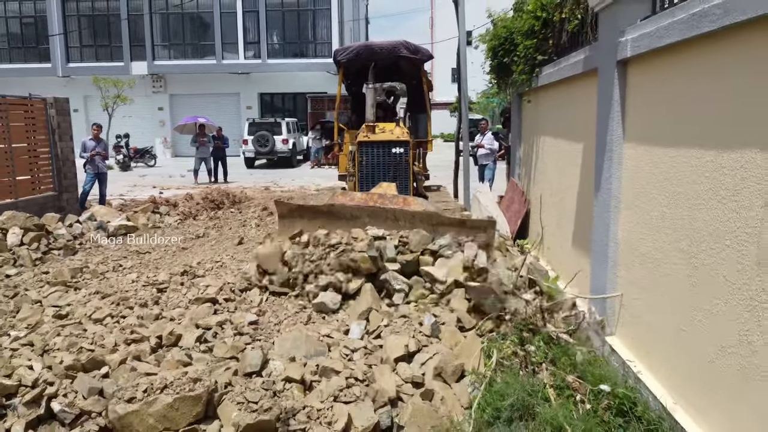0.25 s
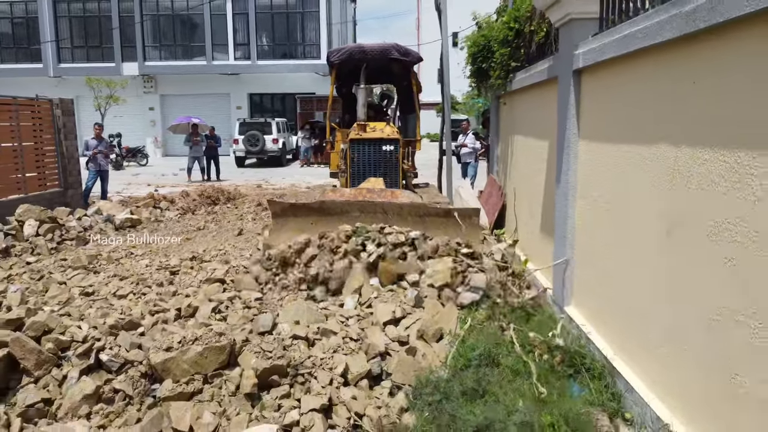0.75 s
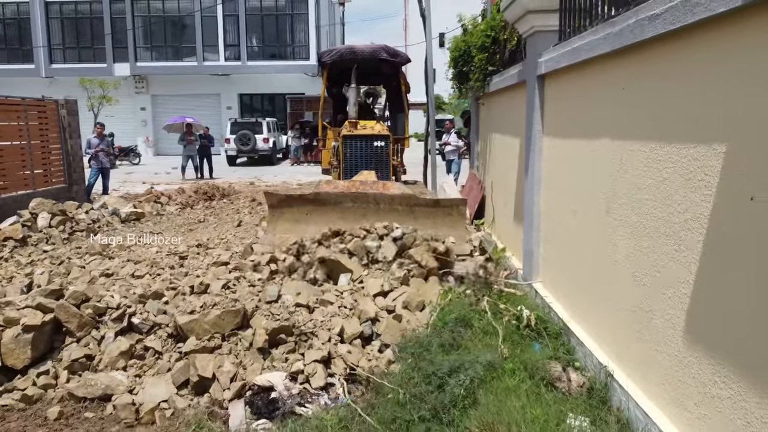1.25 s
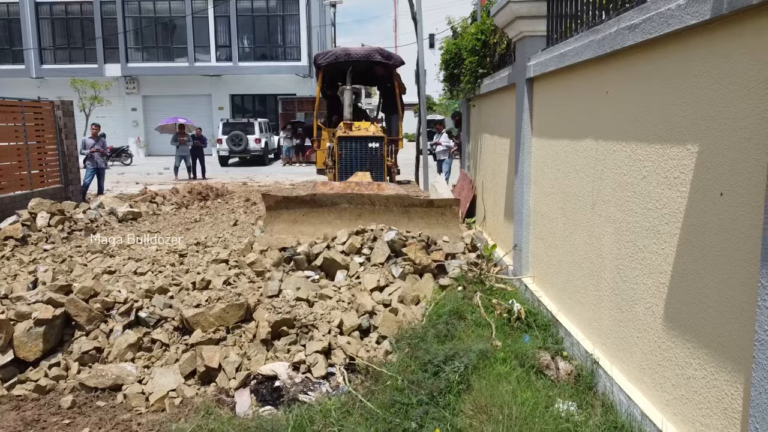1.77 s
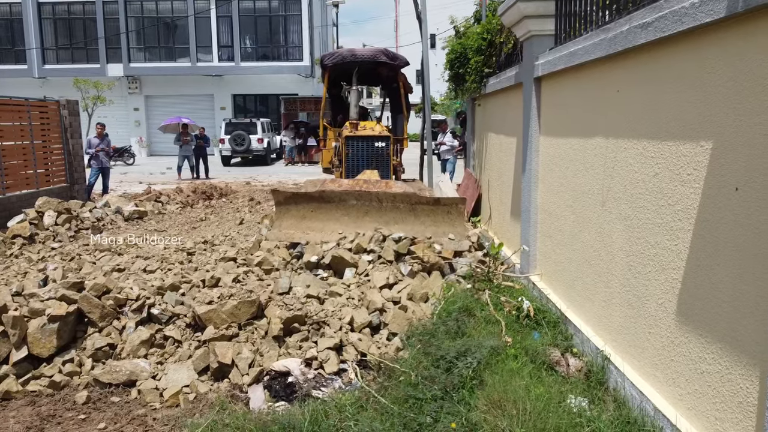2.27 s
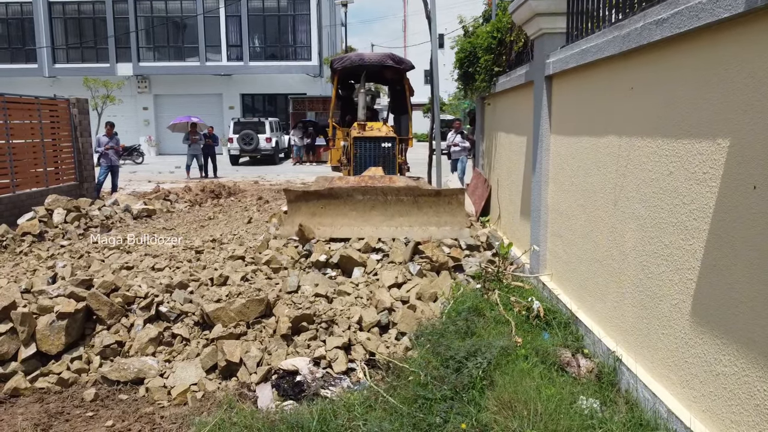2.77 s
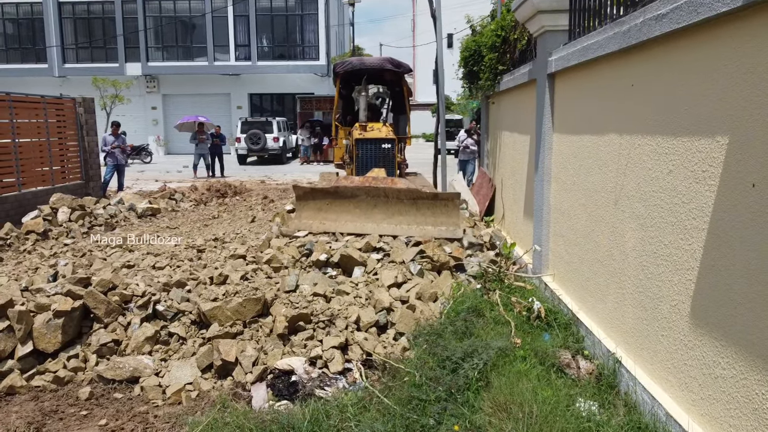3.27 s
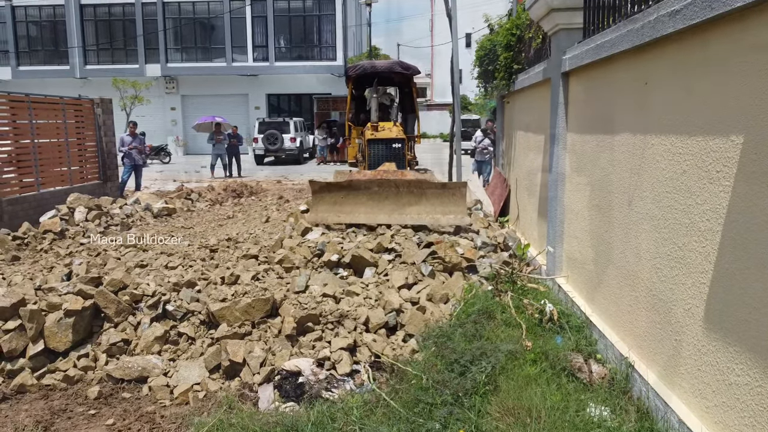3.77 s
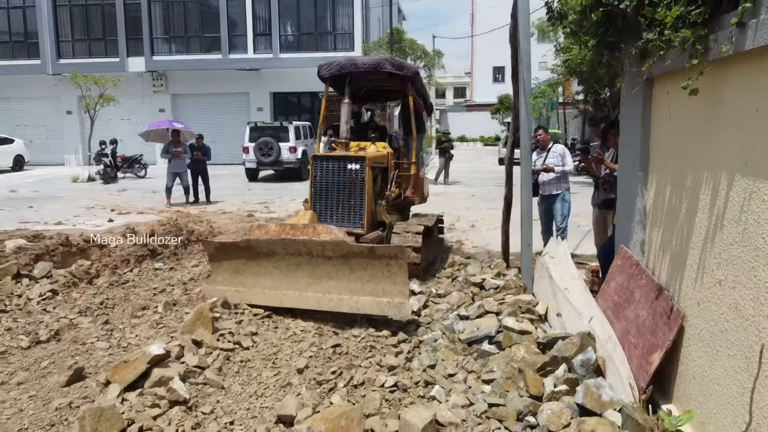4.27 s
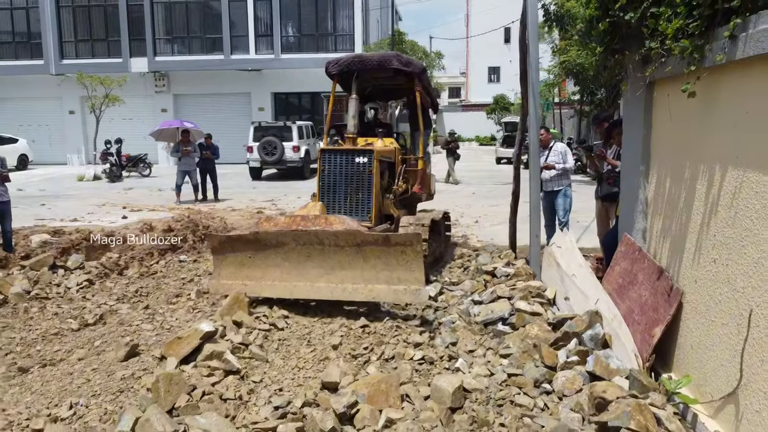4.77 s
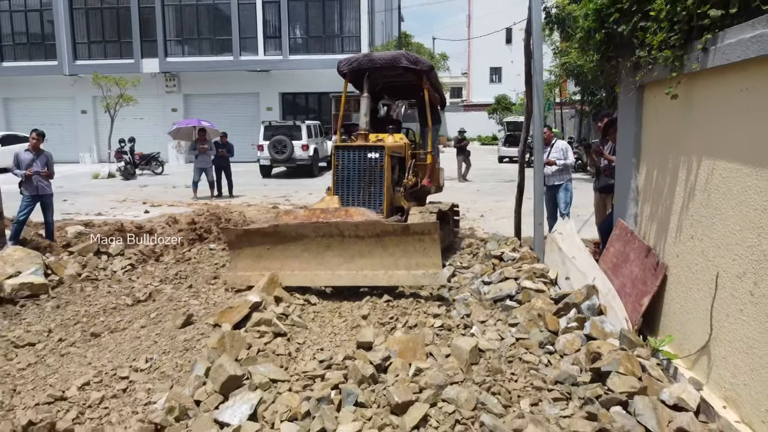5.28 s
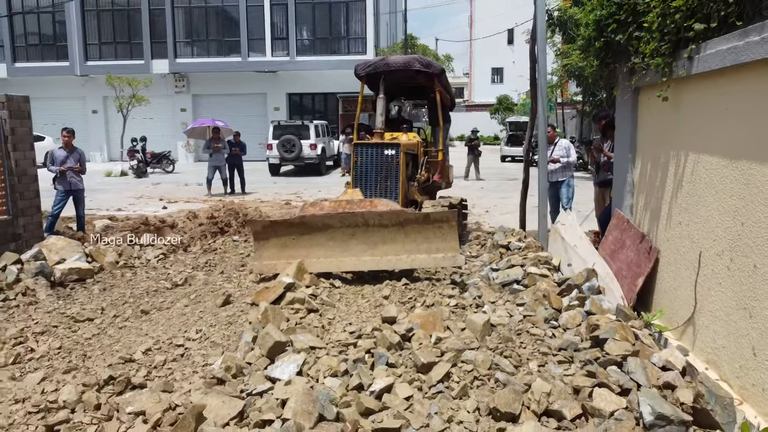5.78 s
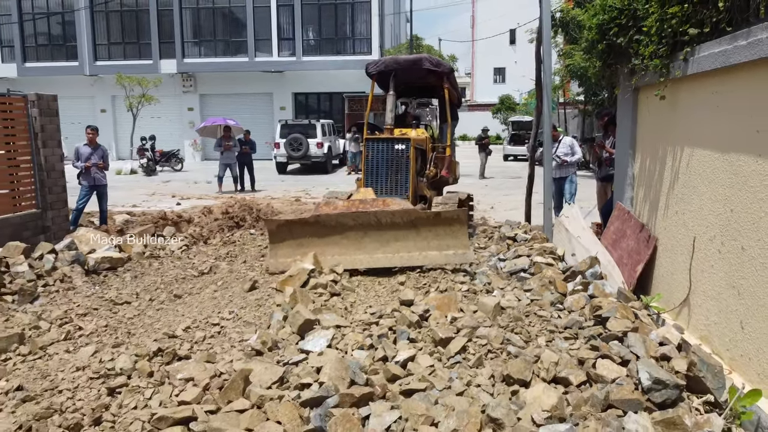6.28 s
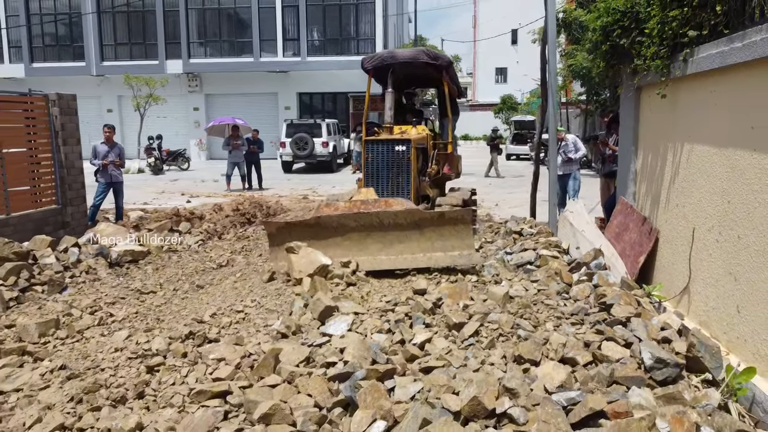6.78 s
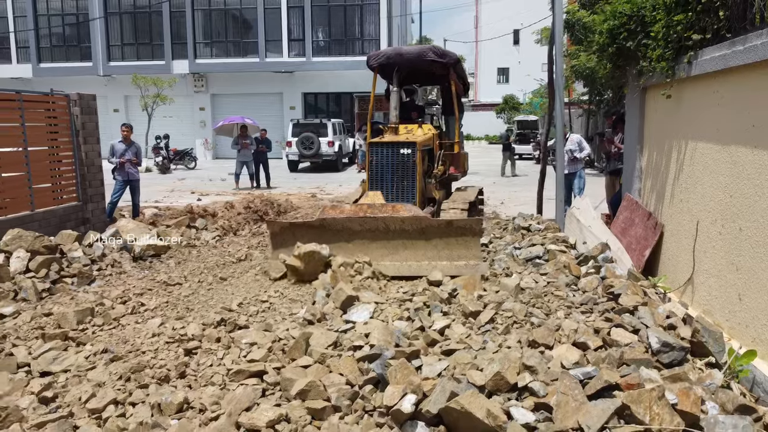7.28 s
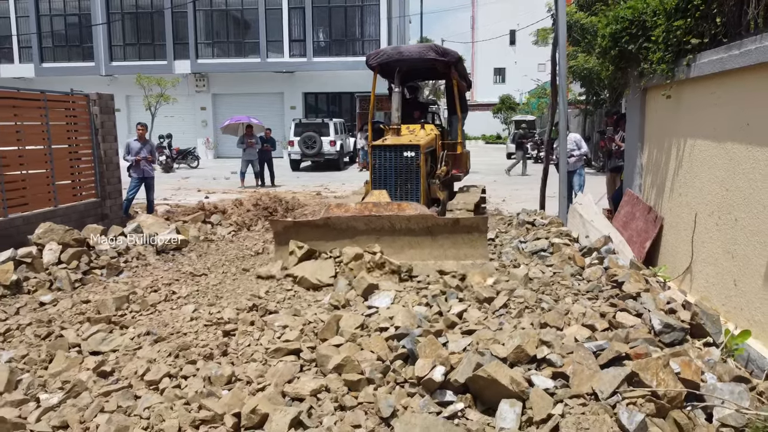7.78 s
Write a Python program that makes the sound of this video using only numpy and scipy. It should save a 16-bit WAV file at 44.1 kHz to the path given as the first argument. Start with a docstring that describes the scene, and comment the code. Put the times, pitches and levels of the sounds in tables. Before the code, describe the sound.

Throughout, a bulldozer's six-cylinder diesel drones near 60 Hz, with ragged exhaust puffs, broad fan rush, knocking and whirring gears; its speed sags and recovers slightly under load. Stone grinds and gritty chips hiss continuously, with small clacks and jingling track links. Brief pump whines come at 0.3 and 1 seconds, with short pin squeaks between 0.3 and 1.3. A cluster of rock clacks hits at 0.8. From 2.1 to 2.9 stones crack, clatter and thud densely against the blade. Around 3.95 the stereo image shifts and the engine rises slightly. A hard double clack strikes at 4.4, lesser knocks follow, then low thuds at 4.8 and 5.1. Pump whine sustains from 5.2 to about 7, with squeaks near 5.9 and 6.4, while rubble eases. From 7.25 a resonant steel scrape grows and grinding swells to the end. Outdoor walled lane, short diffuse reflections.

```python
"""A walled lane, where a bulldozer pushes broken stone.
Its six-cylinder diesel is built from firing-rate tones, gas puffs, knocks, fan rush and gear rattle.
A gear pump whines in timed strokes; tracks squeak and jingle as short tones.
Stone grinds, slides and cracks as filtered random clicks, and thuds and clacks as ringing modes.
About halfway, the engine's rush, knock and gears rise 2 dB and the stereo image shifts."""
import sys
import numpy as np
from scipy import signal
from scipy.fft import rfft, irfft, next_fast_len
from scipy.io import wavfile
from scipy.ndimage import uniform_filter1d

SR = 44100
rng = np.random.default_rng(int(sys.argv[2]) if len(sys.argv) > 2 else 0)


def store_wav(level_fs):
    """Save 16-bit WAV to argv[1]."""
    pcm = np.round(np.clip(np.atleast_2d(level_fs), -1, 1) * 32767)
    wavfile.write(sys.argv[1], SR, pcm.T.astype(np.int16))


N = 354563
T = np.arange(N) / SR


def amp(db):
    """Decibels to gain."""
    return 10 ** (np.asarray(db) / 20)


def unit(x):
    """Scales to an rms of 1."""
    return x / np.sqrt(np.mean(x ** 2) + 1e-20)


def curves(rows):
    """Each column of a timed table, drawn out sample by sample."""
    s, *columns = np.transpose(rows)
    return [np.interp(T, s, c) for c in columns]


def read(points, hz):
    """Reads a spectrum table on a log-frequency axis."""
    f, value = np.transpose(points)
    return np.interp(np.log(hz + 1), np.log(f + 1), value)


def add(mix, s, sound):
    """Lays a sound into the mix at time s."""
    part = mix[max(round(s * SR), 0):][:len(sound)]
    part += sound[:len(part)]


def wander(hz):
    """Slow random motion of rms 1: noise rolled off above a given rate."""
    size = next_fast_len(N)
    rolloff = 1 + (np.fft.rfftfreq(size, 1 / SR) / hz) ** 4
    return unit(irfft(rfft(rng.standard_normal(size)) / rolloff, size)[:N])


def ring(x, spectrum, size=4096):
    """Passes x through a body that answers after each blow: a minimum-phase filter of that spectrum."""
    log_gain = np.log(amp(read(spectrum, abs(np.fft.fftfreq(size, 1 / SR)))))
    answer = np.fft.ifft(np.exp(np.conj(signal.hilbert(log_gain)))).real
    return signal.oaconvolve(x, answer[:size // 2])[:N]


def grains(per_s, spread_db):
    """Random clicks; a positive spread makes most small and a few large."""
    sizes = amp(spread_db * np.minimum(rng.exponential(1, N), 4.5))
    struck = rng.random(N) < per_s / SR
    return unit(sizes * rng.standard_normal(N) * struck)


# time of the stereo and engine level shift, and the right channel's delay before and after
SHIFT_S, LAG_BEFORE_S, LAG_AFTER_S = 3.95, -.00006, .00043


def shift():
    """Fades from 0 to 1 within 0.3 s, centred on the shift."""
    return np.clip((T - SHIFT_S) / .3 + .5, 0, 1)


def ports(x):
    """Direct sound in stereo: a small delay between the channels moves the image at the shift."""
    before, after = (np.roll(x, round(lag * SR)) for lag in (LAG_BEFORE_S, LAG_AFTER_S))
    turn = shift() * np.pi / 2
    right = np.cos(turn) ** 2 * before + np.sin(turn) ** 2 * after
    return np.array([x, right])


def place(x, left_db):
    """Direct sound in stereo, leaning to one side by level."""
    return ports(x) * amp([[left_db], [-left_db]])


# decay of the lane's echoes: pitch_hz, t60_s
ECHO_DECAY = [(150, 0.1), (1000, 0.11), (4000, 0.4), (12000, 0.089)]
# left-right likeness of the echoes: pitch_hz, correlation (-1 to 1, no unit)
ECHO_LIKENESS = [(100, -0.12), (250, 0.75), (400, 0.6), (700, -0.075), (950, 0.057), (1250, 0.44),
                 (1600, -0.68), (2500, -0.033), (14000, 0.08)]


def lane(x, size):
    """Walls scatter sound into a diffuse wash: band powers linger, and random phases fill them."""
    hop = size // 4
    hz, _, z = signal.stft(x, SR, nperseg=size, noverlap=size - hop)
    keep = amp(-60 * hop / SR / read(ECHO_DECAY, hz)) ** 2
    power = abs(z) ** 2 * (1 - keep)[:, None]
    for frame in range(1, power.shape[1]):
        power[:, frame] += keep * power[:, frame - 1]
    a, b = rng.standard_normal((2, *z.shape)) + 1j * rng.standard_normal((2, *z.shape))
    same = read(ECHO_LIKENESS, hz)[:, None]
    right = same * a + np.sqrt(1 - same ** 2) * b
    wash = signal.istft(np.array([a, right]) * np.sqrt(power), SR, nperseg=size, noverlap=size - hop)[1]
    return x.std() * unit(wash[:, :N])


def interference(x, depth_db=2.5, size=2048):
    """Narrow bands drift up and down in level, as when reflections reinforce and cancel."""
    z = signal.stft(x, SR, nperseg=size)[2]
    smooth = np.outer(np.hanning(6), np.hanning(17))  # across bands and across time
    drifting = signal.fftconvolve(rng.standard_normal(z.shape[1:]), smooth, "same")
    z = z * amp(depth_db * unit(drifting))
    return x.std() * unit(signal.istft(z, SR, nperseg=size)[1][:, :N])


# engine speed before hunting, with sags under load: time_s, firing_rate_hz
ENGINE_SPEED = [(0, 59.2), (0.3, 60.64), (0.7, 59.3), (.9, 60.36), (1.25, 59.6), (1.45, 60.95), (2.2, 60.8),
                (2.4, 59.9), (3.15, 59.47), (3.45, 60.93), (3.95, 59.85), (4.17, 58.3), (4.45, 59.87),
                (4.9, 59.43), (5.25, 60.1), (5.5, 58.73), (5.85, 61.76), (6.9, 61.88), (7.05, 60.47),
                (7.2, 58.13), (7.52, 57.55), (8.04, 59.06)]
# governed top speed, and the size and rate limit of the hunting below it
TOP_HZ, HUNT_HZ, HUNTS_PER_S = 61.43, 0.2504, 4.14


def crankshaft():
    """Firings counted since the start: a timed speed curve, which hunts below the governed top speed."""
    firing_hz, = curves(ENGINE_SPEED)
    lugging = np.clip(TOP_HZ - firing_hz, 0, 1)
    return np.cumsum(firing_hz + HUNT_HZ * lugging * wander(hz=HUNTS_PER_S)) / SR


# colour of the engine block and fan: pitch_hz, relative_level_db
BLOCK_COLOUR = [(200, -30), (480, -27), (650, -5.5), (850, 8), (1020, 7), (1180, -13.5), (1750, 0),
                (2200, -7), (2600, -11.5), (3400, -31), (4300, -11), (5400, -42), (8800, -24), (14000, -42)]


def rush(level_db=-30.5):
    """The fan drives a steady rush of air over the block: noise in the block's colour."""
    return amp(level_db) * unit(ring(rng.standard_normal(N), BLOCK_COLOUR))


def knock(turns, level_db=-43.0, uneven_db=2.0, jitter_s=.0001, fade_s=0.0026, alike=0.8, count=6):
    """Each firing raps the block; every cylinder has its own short burst, varied a little each time."""
    out, t = np.zeros(N), T[:SR // 50]
    cylinders = rng.standard_normal((count, len(t)))
    for k, s in enumerate(T[1:][np.diff(turns.astype(int)) > 0]):
        late, strength = rng.standard_normal(2)
        rap = alike * cylinders[k % count] + np.sqrt(1 - alike ** 2) * rng.standard_normal(len(t))
        add(out, s + jitter_s * late, amp(uneven_db * strength) * rap * np.exp(-t / fade_s))
    return amp(level_db) * unit(ring(out, BLOCK_COLOUR))


# colour of the timing gears and valve train: pitch_hz, relative_level_db
GEAR_COLOUR = [(300, -31), (550, -12.5), (650, -2.5), (850, -4), (1000, 2), (1180, -10), (1400, -1.5),
               (1800, -1.5), (2100, -8.5), (2450, -5), (3000, -17), (4500, -17.5)]


def strands(turns, spread_db=7.5, drift_hz=1.3, count=6, overtones=480, size=16384):
    """Gears and valves repeat each six firings: unequal overtones follow speed and trade strength."""
    out = np.zeros(N)
    place_in_cycle = (turns / count % 1 * size).astype(int) % size
    for _ in range(2):  # two cycles fade in and out independently
        strength, a, b = rng.standard_normal((3, overtones))
        random_phase = np.exp(1j * np.arctan2(a, b))
        cycle = irfft(amp(spread_db * np.clip(strength, -2, 2)) * random_phase, size)
        out += cycle[place_in_cycle] * wander(hz=drift_hz)
    return unit(ring(out, GEAR_COLOUR))


def geartrain(turns, level_db=-32, echo_db=-2):
    """The gear train whirrs directly, and off the walls as a different mix in each channel."""
    echoes = np.array([strands(turns), strands(turns)])
    return amp(level_db) * unit(place(strands(turns), left_db=0.5) + amp(echo_db) * echoes)


def firings(turns, fade, uneven_db, count=6):
    """A sharp rise and fade at each firing, with a strength pattern over the cylinders and chance."""
    stroke = turns.astype(int)
    chance = rng.standard_normal(stroke[-1] + 1)[stroke]
    strength_db = uneven_db * (np.cos(2 * np.pi * stroke / count) + chance)
    return unit(amp(strength_db) * np.exp(-(turns % 1) / fade))  # fade in firing periods


# colour of the exhaust pipe and hull: pitch_hz, relative_level_db
PIPE_COLOUR = [(25, -51), (50, -2), (80, -5.5), (110, 3.5), (150, -2), (205, -1.5), (240, -3.5), (320, -2),
               (420, -6.5), (550, -18.5), (900, -38.5), (3000, -64)]


def exhaust(turns, rumble_db, puffs_db=-7.5, rocks_db=-7.5, lurch_db=1.4):
    """Ragged puffs of gas (gated noise) and the dull, lurching tumble of rocks under the hull (clicks)."""
    gas = firings(turns, fade=0.42, uneven_db=0.5) * rng.standard_normal(N)
    tumble = grains(per_s=400, spread_db=0.0) * amp(lurch_db * wander(hz=2.2))
    puffs, rocks = unit(ring(gas, PIPE_COLOUR)), unit(ring(tumble, PIPE_COLOUR))
    return amp(rumble_db) * (amp(puffs_db) * puffs + amp(rocks_db) * rocks)


# the exhaust note before its swells: time_s, firing_tone_level_db, octave_level_db
EXHAUST_NOTE = [(0, -23, -27.5), (0.5, -22, -25), (1.2, -22, -25), (1.4, -22.5, -28), (2.15, -21, -27.5),
                (2.7, -21.5, -23.5), (3.3, -22.5, -24), (3.7, -24.5, -20), (4.25, -23.5, -19.5),
                (4.5, -27, -21), (5.1, -28, -27), (5.5, -22, -19), (5.85, -25.5, -23.5), (7.0, -23, -22),
                (7.45, -20, -14.5), (8.04, -21.5, -18)]
# weaker exhaust tones before their sway: multiple of the firing rate (no unit), level_db
EXHAUST_OVERTONES = [(3, -33), (4, -41.5), (5, -39.5)]
# belt-driven fan before its sway: multiple of the fan's turning rate (no unit), level_db
FAN_PARTIALS = [(2, -39), (3, -38), (4, -37), (5, -40), (6, -32.5), (8, -44)]
FAN_ORDER = .534  # fan turns per firing


def drone(turns, rumble_db, waver=0.11, sway=0.069, first_swell_db=-0.24, octave_swell_db=0.64,
          overtone_waver=0.24, follow=0.85):
    """Two strong exhaust tones swell a little; weaker exhaust and fan tones waver and beat around them."""
    first_db, octave_db = curves(EXHAUST_NOTE)
    first = amp(first_db + first_swell_db * wander(hz=14.0)) * np.cos(2 * np.pi * turns)
    octave_phase = 4 * np.pi * turns + 2 * np.pi * sway * wander(hz=3.0)
    octave = amp(octave_db + octave_swell_db * wander(hz=7.5)) * np.cos(octave_phase)
    note = (first + octave) * (1 + waver * wander(hz=22))
    shake = amp(follow * (rumble_db - rumble_db.mean()))  # weaker tones swell with the rumble
    tones = [(k, db) for k, db in EXHAUST_OVERTONES] + [(k * FAN_ORDER, db) for k, db in FAN_PARTIALS]
    for order, db in tones:
        tone = np.cos(2 * np.pi * (order * turns + rng.random()))
        note += amp(db) * shake * (1 + overtone_waver * wander(hz=3.4)) * tone
    return np.sqrt(2) * note


# the hydraulics work the blade: start_s, length_s, tooth_tone_level_db, octave_level_db (before waver)
PUMP_STROKES = [(0.31, 0.36, -28, -38.5), (1.05, 0.13, -26.5, -58), (2.53, .16, -32.5, -39),
                (2.92, 0.13, -35, -34), (4.055, 0.18, -41, -34.5), (4.773, 0.21, -32, -34),
                (5.172, 0.56, -31.5, -31), (5.701, 1.28, -30, -24.7)]
# upper pump tones: multiple of the tooth tone (no unit), level_db against the octave, before upper_db
PUMP_UPPER = [(3, -24), (4, -17), (5, -19.5), (6, -24), (7, -28.5)]
PUMP_ORDER = 5.53  # tooth contacts per firing
# oil pressure builds and bleeds off; between strokes the pump idles
PRESSURE_RISE_S, PRESSURE_FALL_S, IDLE_TOOTH_DB, IDLE_OCTAVE_DB = 0.15, 0.17, -38.5, -45


def pump(turns, upper_db=4, fading_db=1.0, tremble=0.09, slip=0.008):
    """Pump teeth geared to the crankshaft whine as oil pressure rises, holds and falls each stroke."""
    tooth_gain = np.full(N, amp(IDLE_TOOTH_DB))
    octave_gain = amp(IDLE_OCTAVE_DB + fading_db * wander(hz=2.2))
    for start, length, tooth_db, octave_db in PUMP_STROKES:
        rise = np.clip((T - start) / PRESSURE_RISE_S, 0, 1)
        fall = np.clip(1 - (T - start - length) / PRESSURE_FALL_S, 0, 1)
        pressure = rise * fall
        tooth_gain += pressure * (amp(tooth_db) - amp(IDLE_TOOTH_DB))
        octave_gain += pressure * (amp(octave_db) - amp(IDLE_OCTAVE_DB))
    teeth = PUMP_ORDER * turns + slip * wander(hz=8.7)
    upper = np.zeros(N)
    for k, db in PUMP_UPPER:
        upper += amp(db + upper_db + fading_db * wander(hz=4.0)) * np.sin(2 * np.pi * k * teeth)
    octave = (1 + tremble * wander(hz=12)) * np.sin(4 * np.pi * teeth)
    return np.sqrt(2) * (tooth_gain * np.sin(2 * np.pi * teeth) + octave_gain * (octave + upper))


def clinks(grind_db, level_db=-35.5, follow=1.0, t60=0.21, tilt_db=-15, spread_db=13, count=1400):
    """Track links and loose plates jingle as short random tones, louder along with the grinding."""
    out, t = np.zeros(N), T[:SR // 7]
    for when, pitch, size in rng.random((count, 3)):
        hz = 720 * (4500 / 720) ** pitch
        db = tilt_db * max(np.log2(hz / 1800), 0) - spread_db * size  # high and small clinks are weaker
        add(out, when * N / SR, amp(db - 60 * t / t60) * np.sin(2 * np.pi * hz * t))
    return amp(level_db + follow * (grind_db - grind_db.mean())) * unit(out)


# short whistles, mostly from dry track pins, plus one brief surge of the pump's 2.4 kHz tone at 5.9 s: start_s,
# length_s, level_db (rms before the fade shape), pitch_hz (centre)
WHISTLES = [(.32, 0.11, -46, 4300), (.436, 0.04, -42.5, 7820), (0.538, 0.26, -39.5, 2290),
            (.905, 0.039, -36, 2520), (1.153, 0.16, -52, 4298), (1.232, 0.021, -29.5, 3400),
            (2.51, 0.047, -48, 7500), (3.61, .038, -46, 7840), (5.273, 0.052, -50, 7620),
            (5.374, 0.036, -38, 7850), (5.901, 0.27, -39, 2390), (6.119, .038, -46, 10340),
            (6.422, 0.041, -39, 3367), (7.745, 0.042, -44, 7880), (7.983, 0.033, -54, 7930)]


def squeaks(rough=.009):
    """Steel slips on steel in a short whistle, or the pump's high tone surges briefly; each is roughened by
    random pitch."""
    out = np.zeros(N)
    for s, length, db, hz in WHISTLES:
        size = int(length * SR)
        pitch = hz * (1 + rough * unit(uniform_filter1d(rng.standard_normal(size), 60)))
        whistle = np.sin(2 * np.pi * np.cumsum(pitch) / SR)
        add(out, s, amp(db) * np.sqrt(2) * np.hanning(size) * whistle)
    return out


# stone moving at the blade: time_s, rumble_db, grinding_db, grit_db (each relative to its layer's trim)
HEAP_MOTION = [(0, -22.5, -22, -32.5), (.3, -21, -21.5, -34), (.55, -21.5, -23.5, -36),
               (1.1, -22, -25, -35), (1.6, -21.5, -27, -34.5), (2, -22.5, -24.5, -32.5),
               (2.3, -19.5, -20.5, -32), (2.7, -19, -22, -32), (3.1, -19.5, -25, -32.5),
               (3.7, -20.5, -25.5, -31), (4.45, -18.5, -19.5, -32), (4.8, -18, -24, -32),
               (5.5, -19.5, -20.5, -34), (5.95, -21, -29.5, -37), (6.5, -20.5, -27, -34.5),
               (7.2, -26.5, -25, -38.5), (7.7, -22.5, -24, -32.5), (8.04, -19, -18, -48)]
# colour of fine sliding grit: pitch_hz, relative_level_db
GRIT_COLOUR = [(800, -2.5), (2800, 10.5), (4300, -1.5), (5400, -3.5), (6400, -3), (8000, -8.5), (9000, -11),
               (10500, -10), (14000, -16.5)]


def grit(grit_db, level_db=-2, spill_db=0.95):
    """Small chips slide off the blade: dense random clicks in uneven spills of fine hiss."""
    chips = unit(ring(grains(per_s=12000, spread_db=0.0), GRIT_COLOUR))
    return amp(grit_db + level_db + spill_db * wander(hz=21)) * chips


# colour of coarse stone, shared by grinding and cracks: pitch_hz, relative_level_db
STONE_COLOUR = [(100, -46), (300, 4.5), (500, 1), (700, 9.5), (1000, -3.5), (1500, 5), (2000, -2),
                (2700, -8.5), (3600, -10.5), (5200, -20), (14000, -32.5)]


def rubble(grind_db, crush_db=-6):
    """Stone crushes in quick clumps of random clicks."""
    clumps = grains(per_s=1100, spread_db=2.0) * amp(1.8 * wander(hz=90))
    return amp(grind_db + crush_db) * unit(ring(clumps, STONE_COLOUR))


# the blade's scraped edge: pitch_hz (before drift), width_hz, relative_level_db
EDGE_RESONANCES = [(478.4, 45, -6), (610, 30, 14.5), (732, 53, -23), (1284, 45, 13), (1628, 83, -9)]
SCRAPE_S, SCRAPE_RISE_S, SCRAPE_DB = 7.25, 0.5, -27  # start, time to full force, scrape gain


def scrape(drift=0.054):
    """Stone slips along the steel edge with growing force, exciting modes that wander in pitch."""
    slips, out = grains(per_s=2300, spread_db=-0.5), np.zeros(N)
    for hz, width, db in EDGE_RESONANCES:
        # a one-pole resonator whose centre frequency moves
        turn = np.exp(2j * np.pi * np.cumsum(hz * (1 + drift * wander(hz=3.77))) / SR)
        r = np.exp(-np.pi * width / SR)
        out += amp(db) * unit((turn * signal.lfilter([1 - r], [1, -r], slips / turn)).real)
    return amp(SCRAPE_DB) * np.clip((T - SCRAPE_S) / SCRAPE_RISE_S, 0, 1) * unit(out)


# heavy rocks on the blade: start_s, relative_level_db, pitch factor on the modes (no unit)
ROCK_THUDS = [(.185, -9, 0.98), (0.706, -12, 0.83), (.955, -6, 0.78), (.972, -13, 1.03),
              (1.736, -8.5, 0.76), (1.779, -14.5, 0.93), (2.125, -8.5, 0.98), (2.607, -13, 1.34),
              (2.629, -7, 0.7), (2.690, -9, 1.03), (2.826, -8.5, 1.08), (2.868, -17, 1.12),
              (4.72, -11, 1.45), (4.839, -3.5, 1.11), (4.866, -9, 1.14), (5.075, -0.5, 0.99),
              (5.097, -16, 1.44)]
# the blade's low modes: pitch_hz (before the pitch factor), relative_level_db, t60_s
BLADE_MODES = [(119.6, -0.5, 0.114), (165, 6.5, 0.072), (271.6, 4, 0.087), (328, 9.5, 0.046),
               (443, -10, 0.088), (581, -12.5, 0.1)]


def thuds(rise_s=0.01, level_db=-2):
    """A heavy rock leans into the blade and sets its low modes going."""
    out, t = np.zeros(N), T[:SR // 3]
    soft_onset = 1 - np.exp(-(t / rise_s) ** 2)
    for s, db, pitch in ROCK_THUDS:
        modes = np.zeros(len(t))
        for hz, mode_db, t60 in BLADE_MODES:
            modes += amp(mode_db - 60 * t / t60) * np.sin(2 * np.pi * hz * pitch * t)
        add(out, s, amp(db + level_db) * modes * soft_onset)
    return out


# stones crack and give way: start_s, relative_level_db, fade_s, brightness_db_per_octave
STONE_CRACKS = [(0.079, -24, 0.016, -1.5), (.185, -41, .03, 20), (0.679, -31, 0.024, 3.5),
                (.76, -37, 0.019, -3), (1.365, -26.5, 0.017, 2), (2.194, -21.5, .025, 0),
                (2.54, -23, 0.013, -0.5), (2.602, -16, 0.036, -8), (2.69, -27, 0.022, 8.5),
                (2.68, -20, 0.04, -3), (2.7, -25, 0.022, 1.5), (2.82, -23, 0.065, 1),
                (3.165, -25, 0.013, 1), (3.755, -36.5, 0.027, 12)]


def cracks(level_db=4, build=0.28):
    """Each fracture builds and dies as a quick shower of snaps with its own brightness."""
    out, t = np.zeros(N), T[:SR // 4]
    octaves = np.log2(np.clip(np.fft.rfftfreq(len(t), 1 / SR), 200, 6500) / 1000)
    snaps = ring(grains(per_s=2500, spread_db=2.5), STONE_COLOUR)
    for s, db, fade, tilt_db in STONE_CRACKS:
        shower = np.roll(snaps, rng.integers(N))[:len(t)]
        shower = irfft(rfft(shower) * amp(tilt_db * octaves), len(t))
        envelope = (1 - np.exp(-t / (build * fade))) * np.exp(-t / fade)
        add(out, s, amp(db + level_db) * envelope.std() * unit(shower * envelope))
    return out


def clack(hz, count=12, t60=0.026, spread_octaves=1.1, snap_db=-5, snap_s=0.0016, contact_s=.0003):
    """One hard contact snaps, and rings a stone's close, short modes."""
    t = T[:SR // 12]
    place_in_band = np.linspace(-1, 1, count) + rng.uniform(-1.27, 1, count) / count
    mode_hz = hz * 2 ** (spread_octaves * place_in_band[:, None])
    modes = np.sin(2 * np.pi * (mode_hz * t + rng.random((count, 1))))
    ringing = unit(np.exp(-place_in_band ** 2) @ modes) * amp(-60 * t / t60)
    band = signal.butter(2, (700, 4500), "bandpass", fs=SR, output="sos")
    snap = unit(signal.sosfilt(band, rng.standard_normal(len(t)))) * np.exp(-t / snap_s)
    return (ringing + amp(snap_db) * snap) * (1 - np.exp(-t / contact_s))


# big stones strike stone: start_s, level_db (of the ring before its decay), pitch_hz (band centre)
STONE_CLACKS = [(.022, -22, 1080), (.763, -18, 1450), (.768, -19, 1500), (.777, -20, 1600),
                (.7803, -17, 2700), (2.086, -21, 1890), (2.25, -17, 2010), (2.418, -17, 1377),
                (2.551, -14, 1460), (2.694, -13, 900), (2.708, -13, 1000), (2.735, -20, 1200),
                (2.856, -19, 1750), (2.888, -19, 1600), (3.246, -24, 1900), (4.4207, -12.5, 1800),
                (4.4228, -10, 1000), (4.477, -19, 1000), (4.538, -19, 1000), (4.587, -17, 1110),
                (6.184, -26, 1290)]


def clacks(grind_db, small_db=-7, spread_db=9, low_hz=750, high_hz=2600, count=300):
    """A few big stones strike hard; many small ones rattle, following the grinding level."""
    big, small = np.zeros((2, N))
    for when, size, pitch in rng.random((count, 3)):
        add(small, when * N / SR, amp(-spread_db * size) * clack(low_hz * (high_hz / low_hz) ** pitch))
    for s, db, hz in STONE_CLACKS:
        add(big, s, amp(db) * clack(hz))
    return big + amp(grind_db + small_db) * small


# gain on the engine's rush, knock and gears before and after the shift
EARLY_DB, LATE_DB = -2.4, -0.4


def scene(bright_wet_db=0, bright_dry_db=-10.0, snaps_wet_db=-9, dull_wet_db=-6, knock_wet_db=-14,
          whine_wet_db=-16):
    """One crankshaft drives the engine and pump; one heap curve drives the stone, which breaks centred."""
    turns = crankshaft()
    rumble_db, grind_db, grit_db = curves(HEAP_MOTION)
    engine_gain = amp(EARLY_DB + (LATE_DB - EARLY_DB) * shift())
    bright = engine_gain * rush() + rubble(grind_db) + grit(grit_db) + scrape()
    dull, whine, knocks = exhaust(turns, rumble_db), pump(turns), thuds()
    ahead = cracks() + clacks(grind_db) + squeaks()
    clatter = clinks(grind_db) + engine_gain * knock(turns)
    # short frames keep the bright wash crisp; long ones resolve the low wash
    high = place(amp(bright_dry_db) * bright, left_db=-5.0)
    high += lane(amp(bright_wet_db) * bright + amp(snaps_wet_db) * (clatter + ahead), size=256)
    low = place(drone(turns, rumble_db), left_db=0.7)
    low += place(dull + knocks, left_db=-0.95) + place(whine, left_db=-0.6)
    low_send = amp(dull_wet_db) * dull + amp(knock_wet_db) * knocks + amp(whine_wet_db) * whine
    low += lane(low_send, size=2048)
    return low + interference(high) + ports(clatter) + ahead + engine_gain * geartrain(turns)


def record(dry, ceiling=.92, edge_hz=14500):
    """Rounds off the very largest peaks, then cuts the treble above the band edge."""
    rounded = dry / (1 + (dry / ceiling) ** 8) ** (1 / 8)
    lowpass = signal.firwin(511, edge_hz, window=("kaiser", 9), fs=SR)
    return signal.oaconvolve(rounded, lowpass[None], "same", axes=1)


dry = scene()
out = record(dry)
store_wav(out)
```